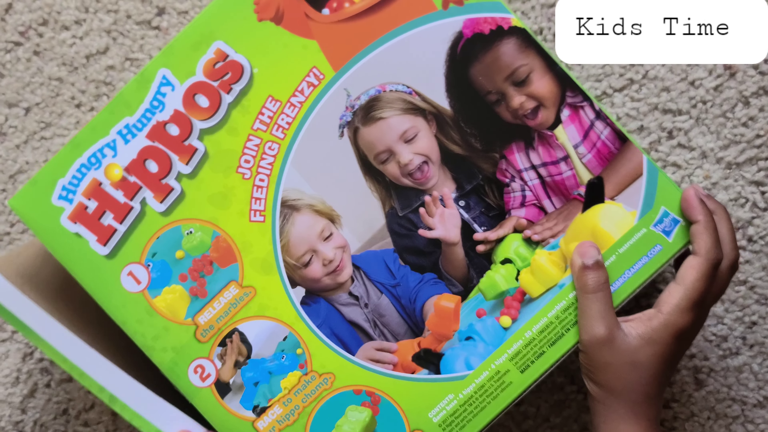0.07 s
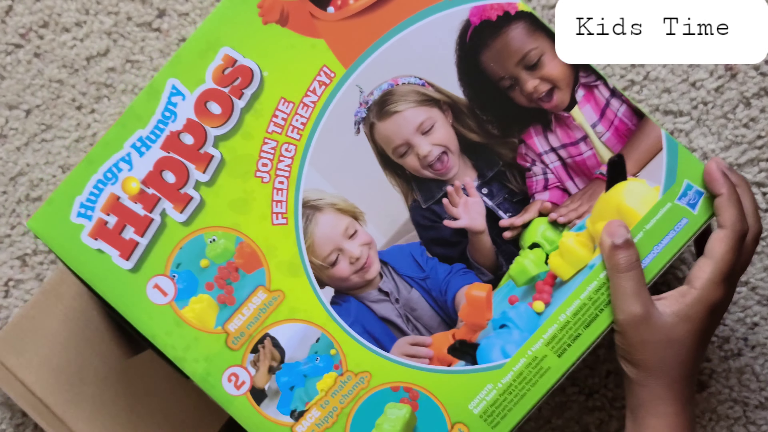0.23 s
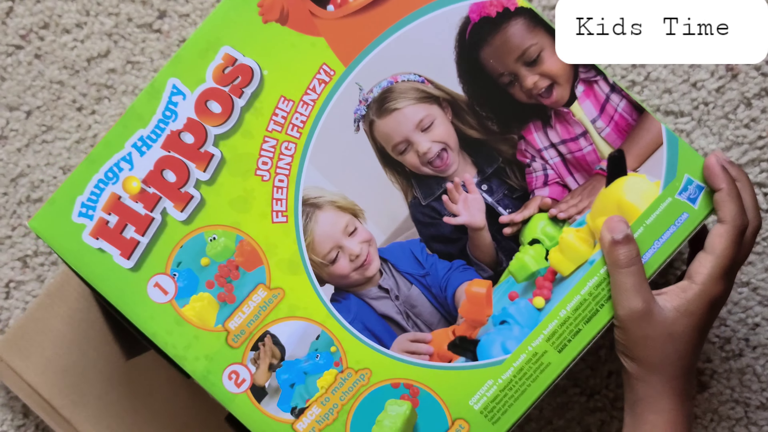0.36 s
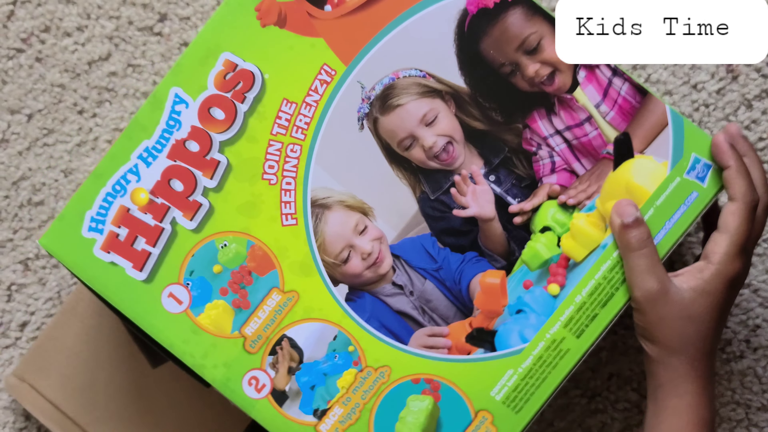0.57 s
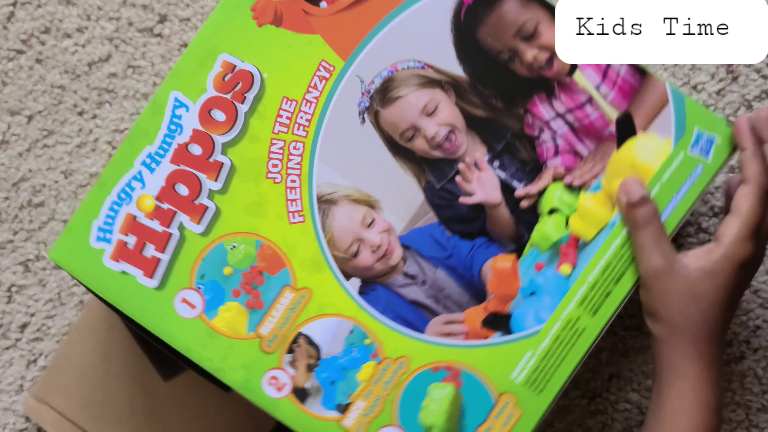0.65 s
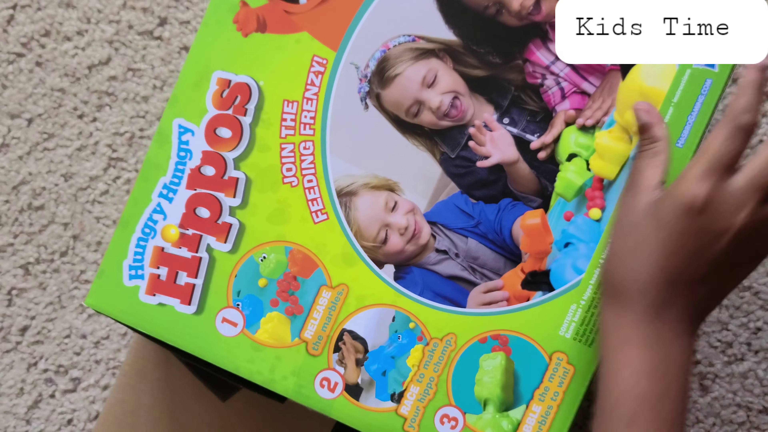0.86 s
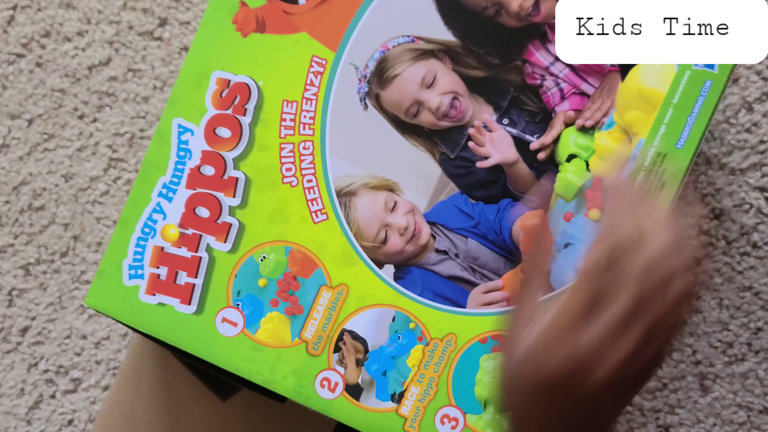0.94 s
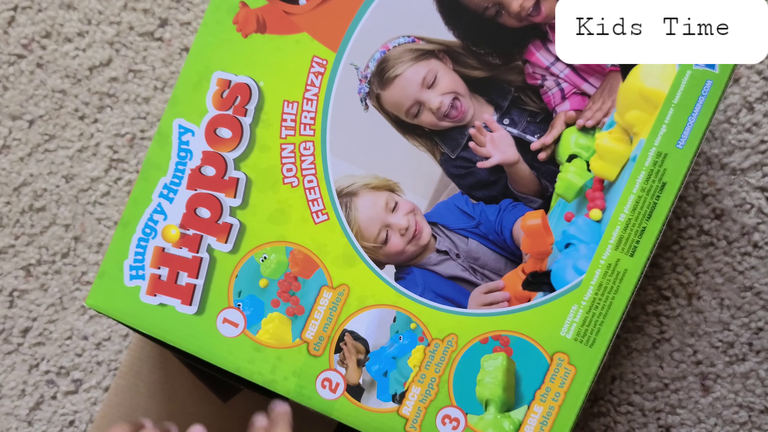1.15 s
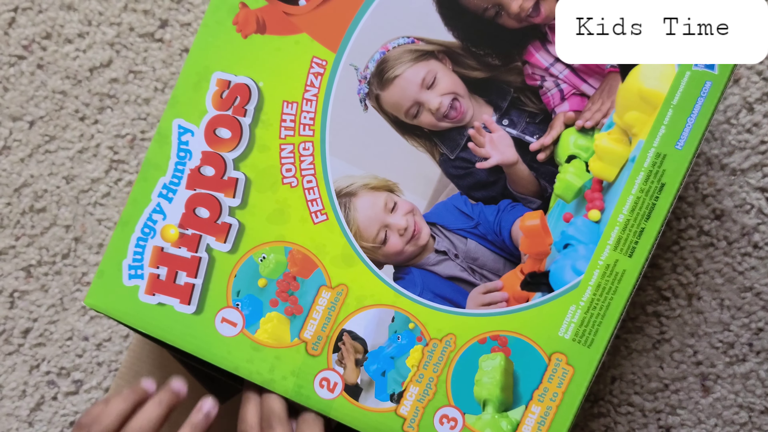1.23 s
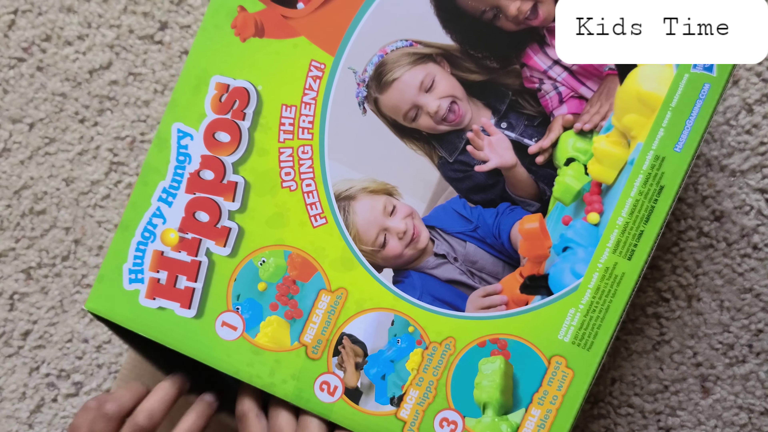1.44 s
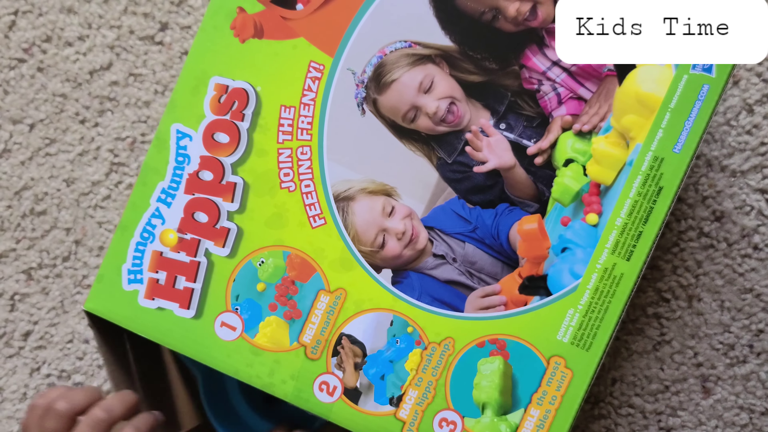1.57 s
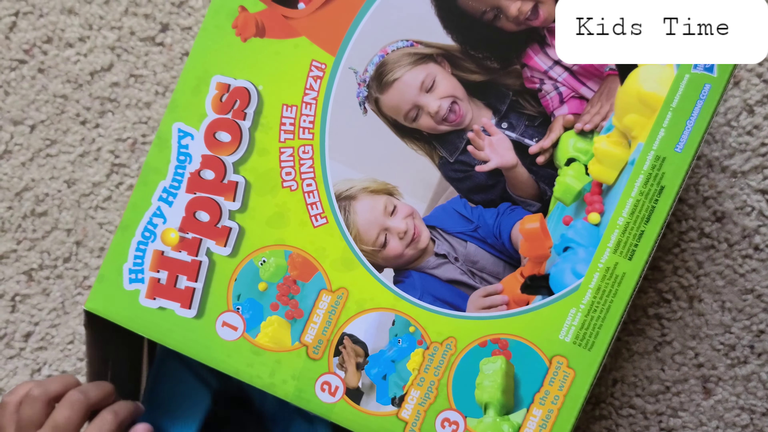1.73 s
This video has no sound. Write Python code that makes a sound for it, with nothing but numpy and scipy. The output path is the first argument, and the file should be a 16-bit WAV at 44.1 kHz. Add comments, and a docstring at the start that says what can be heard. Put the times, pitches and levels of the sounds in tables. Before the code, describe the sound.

Close up in a quiet carpeted room, a cardboard box lands with boomy clustered knocks and scraping, pauses with faint brushing, then softer knocks, rustles and plastic ticks follow as the flap is pulled.

```python
"""Hollow knocks of a cardboard box: it is set down on a carpet with a thud and a few bounces, a hand slides
over its lid, then fingers tug the flap and shift the plastic parts inside, in a quiet room.
Knocks set the box's modes (its own ringing pitches) going. Paper and plastic ticks are short bursts of crackle.
Rubbing is a stream of random clicks: some ring the box, others are coloured into scraping and hiss.
Behind them are a soft room echo, steady air noise and a faint hum."""
import sys
import numpy as np
from scipy import signal
from scipy.fft import rfft, irfft, next_fast_len
from scipy.io import wavfile

SR = 44100
rng = np.random.default_rng(int(sys.argv[2]) if len(sys.argv) > 2 else 0)


def inscribe(sig):
    """Save sig as 16-bit PCM at rate SR to the path in sys.argv[1].

    A 1-D sig is mono; a 2-D sig holds one channel per row.
    Samples are clipped to [-1, 1] before scaling.
    """
    pcm = np.round(np.clip(np.atleast_2d(sig).T, -1, 1) * 32767)
    wavfile.write(sys.argv[1], SR, pcm.astype(np.int16))


N = 92610   # samples, 2.1 s
LEFT_RIGHT = np.array([[1], [-1]])
RUB_LAG_S = 0.00012   # the right ear hears ticks and rubbing this much later


def from_db(db):
    """Turn decibels into a plain factor."""
    return 10 ** (np.asarray(db) / 20)


def pan(left_over_right_db):
    """Factors for left and right that differ by the given decibels."""
    return from_db(left_over_right_db / 2 * LEFT_RIGHT)


def rms_one(x):
    """Scale a sound to an average (rms) level of 1."""
    return x / np.sqrt(np.mean(x ** 2) + 1e-20)


def at_hz(points, hz):
    """Read a curve between its points, with pitch on a log scale."""
    points_hz, values = np.array(points).T
    return np.interp(np.log(hz), np.log(points_hz), values)


def band_filter(x, order, hz, kind):
    """Keep the low, high or middle (band) part of a sound."""
    return signal.sosfilt(signal.butter(order, hz, kind, fs=SR, output="sos"), x)


def drift(rate_hz):
    """Slow random wandering with spread 1: smoothed noise, computed at every 40th sample."""
    r = np.exp(-80 * np.pi * rate_hz / SR)
    noise = rng.standard_normal(N // 40 + 2002)
    slow = signal.lfilter([1], [1, -2 * r, r * r], noise)[2000:]   # skip the start-up
    return np.interp(np.arange(N) / 40, np.arange(len(slow)), rms_one(slow))


def ring(clicks, hz, t60_s):
    """A mode: each unit click starts a sine of height 1 that fades by 60 dB in t60_s."""
    r = from_db(-60 / (t60_s * SR))
    w = 2 * np.pi * hz / SR
    return signal.lfilter([0, np.sin(w)], [1, -2 * r * np.cos(w), r * r], clicks + 1e-18)


def grains(per_s, spread_db):
    """Two unrelated trains of random clicks of uneven size, like many tiny slips."""
    loudness = from_db(spread_db * np.minimum(rng.exponential(1, (2, N)), 5))
    sizes = loudness * rng.standard_normal((2, N))
    return sizes * (rng.random((2, N)) < per_s / SR)


# How alike left and right are. Each row: frequency in Hz, likeness (1 is the same in both ears).
EAR_LIKENESS = [(30, 1), (80, .9), (500, .8), (2000, 0.32), (8000, 0.21)]


def colour(pair, spectrum):
    """Shape two sources by a spectrum and mix them into partly alike left and right; rms 1."""
    hz = np.maximum(np.fft.rfftfreq(N, 1 / SR), 10)
    mid, side = rfft(pair)
    alike = np.clip(at_hz(EAR_LIKENESS, hz), 0, 1)
    octaves_above = np.maximum(0, np.log2(hz / spectrum[-1][0]))
    shape = from_db(at_hz(spectrum, hz) - 8.9 * octaves_above)
    shape = shape * (hz > spectrum[0][0] * .8)   # nothing below the first point
    both = np.sqrt(1 + alike) * mid + np.sqrt(1 - alike) * side * LEFT_RIGHT
    return rms_one(irfft(shape * both, N))


def patchy(pair, low_hz, high_hz, depth_db, rate_hz):
    """Narrow bands swell and fade each on their own, so the colour keeps shifting; rms 1."""
    hz = np.clip(np.fft.rfftfreq(N, 1 / SR), low_hz, high_hz)
    place = 7 * np.log2(hz / low_hz)   # seven bands an octave
    whole, out = rfft(pair), 0
    for k in range(int(place.max()) + 2):
        band = irfft(whole * np.maximum(0, 1 - np.abs(place - k)), N)
        out = out + from_db(depth_db * drift(rate_hz)) * band
    return rms_one(out)


def split(pair):
    """Lower and top part of a bright noise, parted at 9300 Hz, each of rms 1."""
    return [rms_one(band_filter(pair, 3, 9300, kind)) for kind in ("low", "high")]


def later_right(x, lag_s):
    """The right channel hears the source a little later."""
    turn = np.exp(-2j * np.pi * np.fft.rfftfreq(N, 1 / SR) * lag_s)
    return np.array([x[0], irfft(rfft(x[1]) * turn, N)])


# Colour of the air noise. Each row: frequency in Hz, relative level in dB.
AIR_SPECTRUM = [(15, -54), (25, -18.5), (48, -1.5), (130, -6), (161, -33), (309, -28.5), (734, -33),
                (887, -26.5), (988, -41), (2350, -41), (2550, -34), (3520, -37), (4610, -46.5),
                (12200, -56.5), (16000, -56)]
# Steady hum tones. Each row: frequency in Hz, level in dB (rms).
HUM_TONES = [(60, -76), (125, -65)]


def room_tone():
    """Steady air noise is coloured noise; the faint hum is a few plain sines."""
    t = np.arange(N) / SR
    hum = sum(from_db(db) * np.sqrt(2) * np.sin(2 * np.pi * hz * t) for hz, db in HUM_TONES)
    return hum + from_db(-58.5) * colour(rng.standard_normal((2, N)), AIR_SPECTRUM)


def room(x):
    """Echoes go round eight feedback delays a side, duller on every round."""
    t60_s, wall_cut_hz = 0.34, 4700
    size = next_fast_len(N + SR)
    w = 2 * np.pi * np.fft.rfftfreq(size)
    dull = 1 / (1 + 1j * w * SR / (2 * np.pi * wall_cut_hz))
    echoes = np.zeros((2, len(w)), complex)
    for k, lag in enumerate(rng.uniform(0.0086, 0.039, 16) * SR):
        loop = from_db(-60 * lag / SR / t60_s) * dull * np.exp(-1j * w * lag)
        echoes[k % 2] += loop / (1 - loop) * (-1) ** (k // 2)
    return irfft(echoes * rfft(x.mean(axis=0), size), size)[:, :N]


# The box's modes, also played by knocks().
# Each row: frequency in Hz, relative level in dB, time to fade by 60 dB in seconds.
BOX_MODES = [(88.6, 1, 0.088), (151.2, 7, 0.056), (215, -14, 0.097), (256.2, 1.5, .08), (306, 0, .08),
             (370.7, 3, 0.1), (430.5, -1, 0.1), (499.8, 1, 0.056), (633, -4, 0.016), (817, -3.5, 0.049),
             (993, -5, 0.067), (1170, -0.5, 0.014), (1415, 2.5, 0.022), (1739, 2.5, 0.013),
             (2265, 0.5, 0.012), (2720, -1, 0.04)]
# How the rubbing changes. Each row: time in seconds, then the settings in dB for rumble of the box,
# scrape, hiss of the sliding surfaces, and top of the hiss against its lower part.
RUB_LEVELS = [(0, -42, -51, -69, -48), (.04, -51.5, -63, -76, 1), (.14, -54, -57.5, -67, -4),
              (.17, -56, -58, -63, -2), (0.184, -33, -41, -55, 4), (0.204, -35, -43.5, -48, -9.5),
              (0.213, -36.5, -33.5, -51, -15), (0.223, -21, -23, -42, -1), (.25, -38.5, -26, -41.5, -5.5),
              (0.291, -41, -35, -44, -3.5), (0.329, -32.5, -36.5, -48, -5.5), (.4, -63, -51.5, -66, 2),
              (.51, -60, -65, -76.5, 4), (0.543, -59, -73.5, -69, -2), (0.558, -59.5, -52.5, -56, -7),
              (.61, -61.5, -59, -57, -5), (.65, -59.5, -61.5, -66.5, -3), (.74, -58.5, -62, -53, -1),
              (0.778, -62, -56, -56, 0), (.84, -57.5, -57, -49.5, -1), (0.949, -65.5, -69.5, -81, 0),
              (1.19, -68.5, -74, -82, -1.5), (1.34, -51.5, -62.5, -78, 0), (1.366, -66, -70, -67.5, 8.5),
              (1.4, -57, -57.5, -79, -4), (1.439, -36, -61.5, -74, 0), (1.458, -41.5, -42.5, -54.5, -8),
              (1.488, -45, -52.5, -63.5, -22), (1.529, -44.5, -42.5, -48, -14),
              (1.591, -46.5, -39.5, -42.5, -14), (1.611, -31.5, -34, -51, -11),
              (1.635, -40, -39, -43.5, -10), (1.69, -42.5, -41, -48.5, -4.5),
              (1.735, -46.5, -42.5, -51.5, -7), (1.789, -31, -36.5, -47, -3), (1.83, -35, -37, -40.5, -12),
              (1.86, -31, -46, -52, -8), (1.891, -35, -57, -61, -13), (1.921, -41.5, -37.5, -55, 15),
              (1.962, -42, -42, -44.5, 0), (1.99, -43.5, -42, -46.5, 7), (2.015, -43, -43, -53, -1),
              (2.05, -34.5, -37, -45, 0.5), (2.1, -37, -45.5, -53, -8)]
# Colour of the scrape. Each row: frequency in Hz, relative level in dB per Hz.
SCRAPE_SPECTRUM = [(290, -29.5), (500, -4), (825, -5.5), (891, -13.5), (972, -5), (2000, -8.5),
                   (2270, -14.5), (2600, -13), (5000, -31.5), (6500, -60.5), (11000, -120)]
# Colour of the hiss. Each row: frequency in Hz, relative level in dB per Hz.
HISS_SPECTRUM = [(1760, -11.5), (3000, -1), (3380, -12), (4110, -9), (4600, -13), (8760, -12.5),
                 (10100, -9.5), (11900, -6.5), (16000, -7)]


def rub_rumble():
    """Sparse slips shake the low modes of the box, nearly alike on both sides; rms 1."""
    rumble = 0
    for hz, _, t60_s in BOX_MODES[1:8]:
        one, other = grains(400, spread_db=0.0)
        rumble = rumble + ring(one + .2 * other * LEFT_RIGHT, hz, t60_s)
    return rms_one(band_filter(rumble, 2, 115, "high"))


def rub_scrape():
    """Denser slips give a patchy scraping noise and also ring the upper modes."""
    per_s, ring_share_db = 4200, -7
    rings = 0
    for hz, mode_db, t60_s in BOX_MODES[8:]:
        mode = rms_one(ring(grains(per_s, spread_db=0.5)[0], hz, t60_s))
        rings = rings + from_db(mode_db + 7.2 * drift(6.4)) * mode
    noise = colour(grains(per_s, spread_db=1.5), SCRAPE_SPECTRUM)
    noise = patchy(noise, 500, 5000, depth_db=3.5, rate_hz=20)
    return noise + from_db(ring_share_db) * rms_one(rings)


def rub_hiss(top_db):
    """Very dense slips blur into a hiss whose lower and top parts flicker on their own."""
    noise = colour(grains(30000, spread_db=3.5), HISS_SPECTRUM)
    lower, top = split(patchy(noise, 3000, 16000, depth_db=3.5, rate_hz=9))
    return from_db(.8 * drift(30)) * lower + from_db(top_db + 0.88 * drift(30)) * top


def rubbing():
    """Slips of finger, card and carpet shake the box's low modes, scrape in the middle and hiss on top."""
    s, *levels = np.transpose(RUB_LEVELS)
    t = np.arange(N) / SR
    rumble_db, scrape_db, hiss_db, top_db = [np.interp(t, s, level) for level in levels]
    out = from_db(rumble_db + 1.5 * drift(25)) * rub_rumble()
    out += from_db(scrape_db + 1.1 * drift(33)) * rub_scrape()
    out += from_db(hiss_db) * rub_hiss(top_db)
    return later_right(out * pan(-1.5), RUB_LAG_S)


# Ticks of paper edges and plastic. Each row: start in seconds, strength in dB (before a 3 dB cut),
# time to fade by 60 dB in seconds, top against lower part in dB, left over right in dB.
PAPER_TICKS = [(0.178, -40, 0.031, 10.5, -3), (0.218, -20.5, 0.033, -16, 1), (0.2479, -28, 0.04, -3, 8),
               (0.2828, -32, 0.04, 1, 3), (0.304, -40, 0.04, 3, 0.0), (0.5538, -46, 0.031, 4.5, -1),
               (0.559, -58.5, 0.026, -1, 4), (0.599, -50.5, 0.053, -8, 2.5), (1.3684, -60, 0.032, 2, 1),
               (1.3918, -59, 0.036, -16, -6), (1.4524, -44, 0.032, -1, 1.5),
               (1.517, -41.5, 0.044, -14, 0.5), (1.5579, -41, 0.036, -9, 4), (1.6274, -50, 0.035, -4, -4),
               (1.7964, -38, 0.056, -10, 0.0), (1.826, -33, 0.051, -10, 3), (1.9144, -50, 0.04, -5, -4),
               (1.923, -42, 0.04, -10, 3), (1.948, -41, 0.044, 10, -1), (1.9859, -44.5, 0.04, -4, -16),
               (2.0482, -40, 0.052, 0, 5)]
# Colour of the ticks. Each row: frequency in Hz, relative level in dB per Hz.
TICK_SPECTRUM = [(1760, -25.5), (3000, -3), (4140, -7.5), (5290, -9.5), (6440, -14), (13500, -5.5),
                 (16000, -9.5)]


def ticks():
    """Short bright bursts are cut from a crackle of dense clicks; each starts at once and dies away fast."""
    t, out = np.arange(N) / SR, np.zeros((2, N))
    lower, top = split(colour(grains(14000, spread_db=1.5), TICK_SPECTRUM))
    for s, db, t60_s, top_db, pan_db in PAPER_TICKS:
        fade_db = -60 * np.abs(t - s) / max(t60_s, .005)
        shape = (t >= s) * from_db(db - 3 + fade_db) * pan(pan_db)
        out += shape * (lower + from_db(top_db) * top)
    return later_right(out, RUB_LAG_S)


def nearness(hz, centre_hz, spread_oct):
    """A bell curve: how strongly a knock centred on one pitch drives a mode at another."""
    return np.exp(-.5 * (np.log2(hz / centre_hz) / spread_oct) ** 2)


def contact_push(hz, cycles_long):
    """A soft push lasting some cycles of the mode, so its ringing swells up instead of jumping."""
    cycles = np.arange(0, cycles_long, hz / SR)
    window = np.sin(np.pi * cycles / cycles_long) ** 2
    return window * np.sin(2 * np.pi * cycles) * 4 * hz / SR / cycles_long


# Knocks on the box. Each row: start in seconds, strength in dB, pitch of the panel struck in Hz,
# centre of the upper ring in Hz, hardness in dB, left over right in dB.
BOX_KNOCKS = [(.087, -33, 123, 694, -29, 10), (.120, -38.5, 358, 1530, -4, 1),
              (.153, -45, 373, 1380, -4, -1), (.180, -23, 405, 910, -15, 9),
              (0.189, -14.5, 150, 1430, -33.5, 0.5), (0.188, -31.5, 85, 906, -29.5, 0),
              (.218, -12.5, 90, 2500, 0.5, -3.5), (0.2184, -8, 404, 1620, -3.5, 4.5),
              (0.2201, 1.5, 430, 762, -7.5, 11), (.224, 7.5, 239, 740, -20, -1.5),
              (.233, -12.5, 280, 1380, -9.5, -4.5), (.245, -8.5, 323, 758, -14.5, -2),
              (.252, -5.5, 186.4, 1409, -18, 3), (.261, -11.5, 361, 993, -19.5, -6.5),
              (.269, -4.5, 210, 760, -15, 2), (0.279, -21, 85, 1500, -12, -3),
              (0.287, -4, 295, 640, -20, 8), (0.298, -12.5, 320, 790, -16, 5),
              (.331, -13.5, 310, 700, -22, -6), (0.373, -22.5, 296, 800, -16, 2),
              (0.539, -25.5, 200, 1420, -31, -5), (.597, -40.5, 200, 2800, 8, 1),
              (0.773, -34, 131, 1410, -17, 0), (.907, -40.5, 371, 630, -18, -5),
              (1.271, -26, 204, 1250, -21.5, -5), (1.318, -32.5, 355, 1050, -4.5, 2),
              (1.393, -39.5, 282, 1280, -9.5, 2), (1.406, -34, 347, 1260, -24, -8),
              (1.43, -24.5, 292, 1050, -10, 5.5), (1.451, -25, 360, 1010, -18, -6),
              (1.5, -24.5, 480, 1170, -8.5, -1), (1.572, -18, 419, 1160, -18, -14),
              (1.599, -13.5, 249, 1610, -14, -3), (1.605, -8.5, 463, 650, -22.5, -22),
              (1.611, -20, 231, 818, -29, -1), (1.740, -24, 90, 2260, 3, -1.5),
              (1.741, -19, 378, 1003, 1.5, -3), (1.746, -13, 410, 630, -18, -17),
              (1.780, -6.5, 471, 740, -19, -8), (1.790, -9, 510, 1780, -27.5, -16),
              (1.797, -15.5, 144, 1750, -18, -2), (1.811, -14, 144, 1140, -22, -1),
              (1.835, -16.5, 149, 780, -11.5, 4), (1.858, -14.5, 540, 783, -32, -22),
              (1.879, -16.5, 510, 783, -33, -8), (1.910, -29, 407, 1100, -4.5, 1),
              (1.944, -31, 455, 2010, -6, -14), (2.027, -22, 452, 640, -28, 19),
              (2.037, -14.5, 279, 845, -14, 4), (2.051, -22, 470, 784, -20, -22),
              (2.062, -27.5, 195, 790, -10, 11), (2.078, -24.5, 430, 654, -9, -8)]


def knocks():
    """Each knock swells low modes near its panel's pitch and, by its hardness, upper modes and a snap."""
    s, db, pitch_hz, upper_hz, hard_db, pan_db = np.transpose(BOX_KNOCKS)
    at, out = (s * SR).astype(int), np.zeros((2, N))
    chance = rng.standard_normal((len(s), len(BOX_MODES)))
    for k, (hz, mode_db, t60_s) in enumerate(BOX_MODES):
        if hz < 580:   # low modes: hardness plays no part and the pan is weaker
            share = nearness(hz, pitch_hz, 0.2) * from_db(-10) * pan(.3 * pan_db)
            cycles_long = 1.11
        else:
            share = nearness(hz, upper_hz, 0.28) * from_db(hard_db - 0.5) * pan(pan_db)
            cycles_long = 0.0017 * hz   # a push of 1.7 ms
        clicks = np.zeros((2, N))
        clicks[:, at] = (-1) ** k * share * from_db(db + mode_db + 1.5 * chance[:, k])
        pushes = signal.fftconvolve(clicks, contact_push(hz, cycles_long)[None])[:, :N]
        out += ring(pushes, hz, t60_s)
    # the first snap of a hard contact
    snaps = np.zeros((2, N))
    snaps[:, at] = from_db(db + hard_db + 1.5) * pan(pan_db)
    out += band_filter(snaps + 1e-18, 2, [600, 3950], "band")
    return later_right(out, lag_s=0.00017)


def scene():
    """The box sounds without their deepest bass, their echo in the room, and the room's own tone."""
    box = band_filter(knocks() + ticks() + rubbing(), 3, 50, "high")
    return box + from_db(-19.5) * room(box) + room_tone()


def record(dry):
    """The loudest peaks are rounded to stay under .95, then the top is cut steeply at 16300 Hz."""
    rounded = dry / (1 + np.abs(dry / .95) ** 6) ** (1 / 6)
    return signal.sosfilt(signal.cheby2(18, 70, 16300, fs=SR, output="sos"), rounded)


dry = scene()
out = record(dry)
inscribe(out)
```